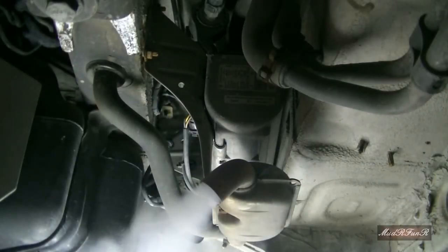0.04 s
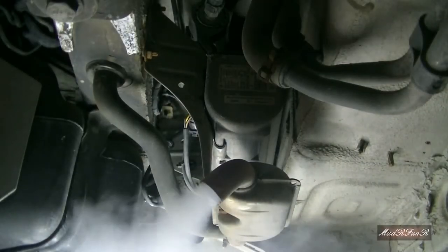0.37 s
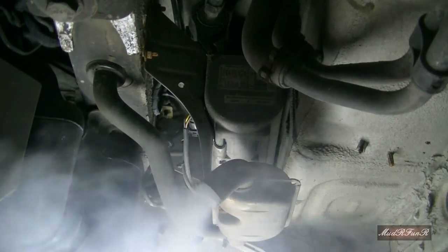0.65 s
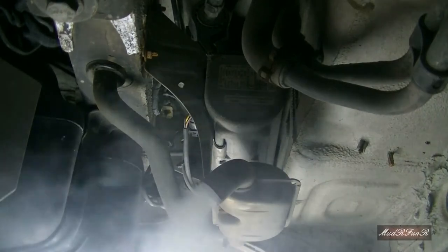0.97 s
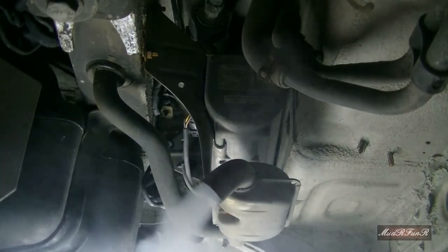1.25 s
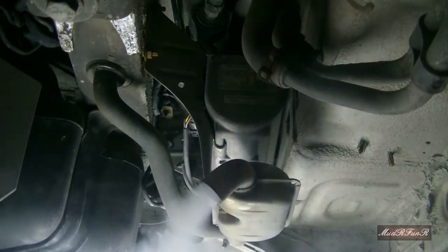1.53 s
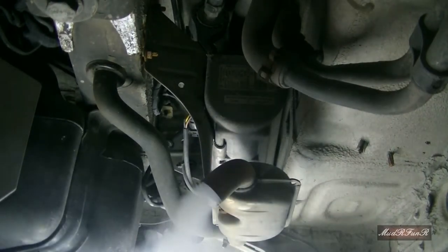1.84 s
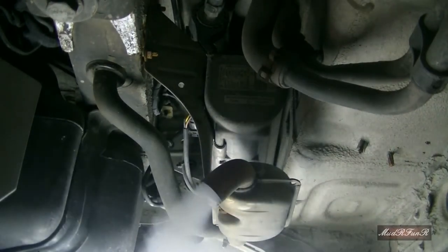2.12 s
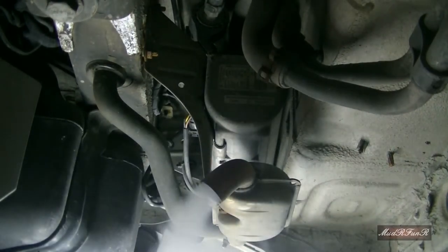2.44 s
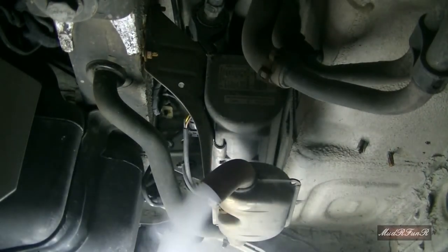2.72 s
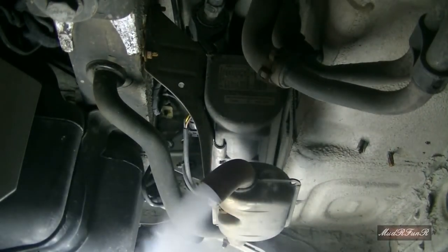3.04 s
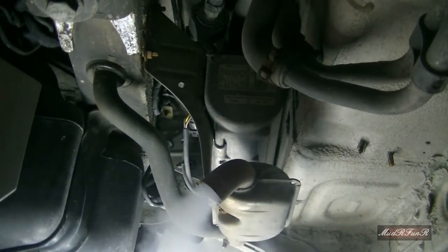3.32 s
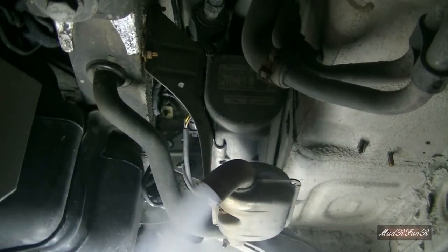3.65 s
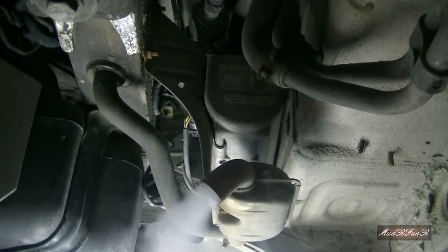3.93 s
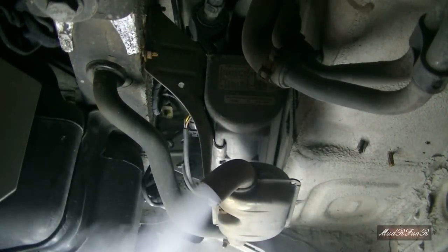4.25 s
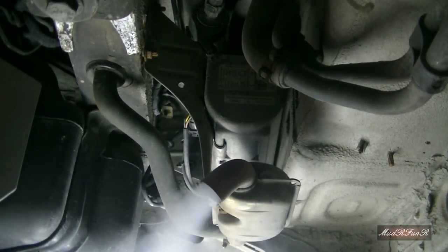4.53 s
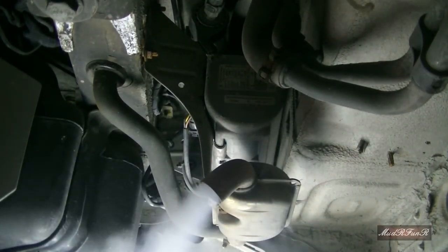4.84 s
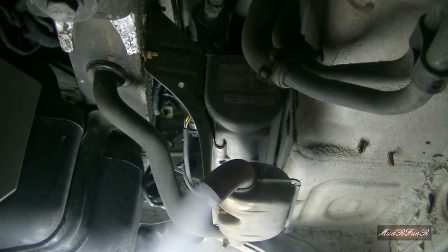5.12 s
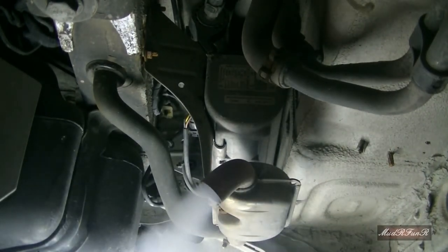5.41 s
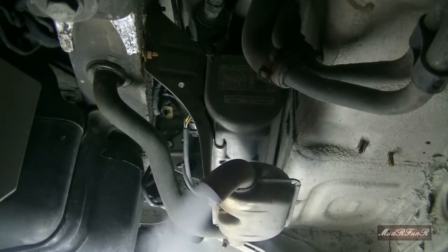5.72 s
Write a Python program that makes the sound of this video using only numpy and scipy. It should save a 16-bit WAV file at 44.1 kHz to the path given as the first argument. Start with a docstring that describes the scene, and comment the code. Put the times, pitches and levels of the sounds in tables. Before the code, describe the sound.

Sharp, regular metallic ticking from a vehicle heater starting up, with a gradually rising fan whir, hiss and faint exhaust rumble.

```python
"""In a carport, a stereo microphone close to a parked vehicle: a fuel-fired heater starts up underneath.
From the outset its solenoid dosing pump clacks about twice a second (the plunger slides, hits its stop
and springs back), briefly echoed by ground and floor pan, and the combustion blower whirs and hisses.
In the first second the exhaust rumbles and puffs, then settles to a soft drone with fainter puffs.
From about two seconds on, the blower slowly gains speed, its whir growing higher and louder."""
import sys
import numpy as np
from scipy import signal
from scipy.fft import rfft, irfft, next_fast_len
from scipy.io import wavfile
from scipy.ndimage import map_coordinates

SR = 44100
rng = np.random.default_rng(int(sys.argv[2]) if len(sys.argv) > 2 else 0)


def master(y):
    """Save y as 16-bit WAV."""
    cut = np.clip(np.atleast_2d(y).T, -1, 1)
    pcm = np.round(cut * 32767)  # scale
    wavfile.write(sys.argv[1], SR, pcm.astype(np.int16))


N = 258867

# the plunger hitting its stop: (time [s], relative level [dB])
PUMP_STROKES = [(-0.042, -23.5), (0.479, -23), (1.0004, -23), (1.5223, -23.5), (2.0328, -24),
                (2.5325, -23.5), (3.033, -24), (3.5229, -24), (4.0039, -23.5), (4.4758, -23),
                (4.9394, -23.5), (5.402, -23), (5.8582, -24.5)]
# ringing of the pump body and its bracket: (frequency [Hz], relative level [dB], t60 [s])
BODY_MODES = [(887, -24, .08), (958, -28, .09), (1187, -13, .085), (1330, -15, .05), (1600, -12, .05),
              (1723, -14, .07), (1830, -11, .045), (1954, -12, .07), (2110, -7, .045), (2335, -8, .07),
              (2490, -12, .05), (2680, -12, .055), (3480, -5, .04), (3670, -3, .045), (3810, -11, .07),
              (3923, -12, .08), (4163, -12, .06), (4624, -7, .04), (4857, -2, .04), (5056, -1, .04),
              (5258, -3, .04), (5900, -9, .045), (6198, -5, .05), (6342, -7, .06), (6578, -8, .045),
              (6939, -9, .04), (7590, -7, .04), (7880, -7, .04), (8069, -6, .05), (8270, -9, .04)]
# dense clatter of the panels around the pump: (frequency [Hz], relative level [dB])
PANEL_CLATTER = [(650, -36.5), (900, -11.5), (1050, -34), (1250, -5.5), (2300, -1), (2900, -5.5),
                 (3600, -4), (4200, -6), (5100, 9), (5600, -4.5), (8100, -2.5), (8800, -8.5),
                 (11000, -18.5), (15500, -33)]
# colour of the plunger sliding, and of it landing on its seat: (frequency [Hz], gain [dB])
SLIDE_COLOUR = [(900, 14), (1500, 3.5), (3000, 2.5), (5200, -7), (7000, 0), (10000, 16.5), (14000, 12.5)]
LANDING_COLOUR = [(900, -3), (2600, 0.5), (3600, 0), (4900, -2.5), (5300, 4.5), (5900, 7), (7000, -3),
                  (8200, -3.5), (14000, 3.5)]
# where the pump sits at the microphone: (frequency [Hz], left minus right [dB])
PUMP_BALANCE = [(1500, -0.5), (2800, -0.5), (3600, -5.5), (5200, -5), (5800, -2.5), (6400, 8.5),
                (7800, 1.5), (9500, -6.5), (12000, 0.5)]
# how alike the microphone's two sides are: (frequency [Hz], correlation [0..1])
STEREO_LIKENESS = [(40, 0.9), (130, 0.93), (280, 0.55), (600, 0.37), (1500, 0.94), (3500, 0.8),
                   (6000, 0.63), (10000, 0.48), (14000, 0.14)]
# echo in the space under the floor pan: (frequency [Hz], t60 [s])
CARPORT_DECAY = [(900, 0.12), (2500, 0.39), (6000, 0.24), (12000, 0.028)]

# blower shaft: (time [s], speed [turns/s])
SHAFT_SPEED = [(0.0, 44.5), (0.08, 45.0), (0.46, 45.2), (1.06, 44.6), (1.5, 44.9), (1.65, 44.4),
               (1.8, 44.5), (2.09, 46.0), (3.3, 50.5), (3.64, 50.9), (3.79, 51.9), (4.12, 52.3),
               (4.69, 54.7), (5.07, 55.0), (5.31, 56.6), (5.51, 57.1), (5.69, 58.6), (5.87, 59.0)]
# tones that stand out of the whir: (order [cycles/turn], relative level [dB])
WHIR_ORDERS = [(10, 5), (15, 5), (17, 4), (26, 5), (33, 6), (36, 7), (38, 4), (43, 7), (46, 4), (52, 8),
               (57, 5), (62, 5), (67, 7), (71, 5), (72, 4), (76, 6), (79, 4), (93, 5), (142, 7), (143, 4),
               (183, 5)]
# rushing air, motor whir and thin jet, ahead of the housing: (frequency [Hz], relative level [dB])
HISS_SPECTRUM = [(250, -10.5), (600, -12.5), (1050, -14), (1400, -9), (2500, -7.5), (3200, -8.5),
                 (4300, -4), (5500, -12), (6300, -13), (8300, -15.5), (10000, -17), (11400, -23),
                 (15500, -25.5)]
WHIR_SPECTRUM = [(300, -11), (700, -17.5), (1050, -16.5), (1400, -4.5), (2500, -8.5), (3200, -1.5),
                 (4000, 1), (4700, -3), (5500, -14.5), (6400, -10), (8000, -13.5), (9800, -2),
                 (11500, -22.5)]
JET_SPECTRUM = [(7000, -32), (8700, -12), (9300, 1), (10100, 7), (10700, -6), (11400, -9), (15500, -23)]
# resonances of the blower housing and pipes: (frequency [Hz], width [Hz], lift [dB])
HOUSING_RESONANCES = [(1580, 17, 0), (1665, 22, -11), (2047.6, 48, 14.5), (2188, 42, 8.5), (2680, 15, 13),
                      (3079, 34, 9), (4040, 32, -1.5), (4037, 44, 7), (4182, 130, 7.5), (4856, 124, 6),
                      (6080, 160, 7), (6480, 37, 16.5), (6500, 88, -2), (10080, 87, 6.5)]
# where the blower sits at the microphone: (frequency [Hz], left minus right [dB])
BLOWER_BALANCE = [(1500, -1.5), (2700, -1.5), (3400, -7), (4200, -2.5), (5400, -4.5), (6400, 6), (8000, -1),
                  (10000, -5), (13000, -0.5)]

# the exhaust's rumble, strongest while the first smoke rolls out: (time [s], level [dB])
RUMBLE_LEVEL = [(0, -48.5), (.4, -53.5), (.62, -44.5), (.85, -54), (1.15, -59), (5.87, -60)]
# single puffs at the pipe's mouth: (time [s], peak level [dB])
MOUTH_PUFFS = [(.022, -38.5), (.29, -39), (0.504, -36), (1.63, -50.5), (1.79, -48.5), (2.79, -46),
               (4.25, -45), (4.66, -46.5), (5.08, -49)]
# gas that rumbles and puffs, and the pipe's drone: (frequency [Hz], relative level [dB])
GAS_SPECTRUM = [(20, -17.5), (50, -0.5), (85, -2.5), (130, -3.5), (180, -8), (260, -17), (500, -39)]
DRONE_SPECTRUM = [(60, -20), (115, -14), (145, 6), (175, -9), (210, 3), (260, -8), (340, -12), (410, -5.5),
                  (520, -15.5), (650, -44), (1200, -32.5)]

RETURN_S = .0494  # from stop to landing: the coil lets go after the same time on every stroke
FLOW_DB, FLOW_DB_PER_OCTAVE = -44.5, 3.5  # blower gain at the starting speed, and its growth with speed
FLICKER_DB, FLICKER_PER_S = 2.5, 11  # the young flame burns unevenly
PUFF_RISE_S, PUFF_FALL_S = 0.02, 0.019  # time constants of a puff's swell and decay
TOP_HZ = 15900


def amp(db):
    """Decibels to gain."""
    return 10 ** (np.asarray(db) / 20)


def unit(x):
    """Scale to rms 1."""
    return x / np.sqrt(np.mean(x ** 2) + 1e-20)


def along(points, hz):
    """(frequency [Hz], value) points read on a log axis."""
    f, v = np.transpose(points)
    return np.interp(np.log(hz + 1), np.log(f + 1), v)


def curve(rows):
    """(time [s], value) rows as one value per sample."""
    return np.interp(np.arange(N) / SR, *np.transpose(rows))


def wobble(rate):
    """A smooth random curve, rate knots a second."""
    knots = rng.standard_normal(int(N * rate / SR) + 4)
    return map_coordinates(knots, [np.arange(N) * rate / SR])


def filtered(x, gain):
    """x through the causal, minimum-phase filter whose magnitude is gain(hz)."""
    n = x.shape[-1]
    m = 2 * next_fast_len(n // 2 + 4096)
    magnitude = np.maximum(gain(np.fft.rfftfreq(m, 1 / SR)), 1e-6)
    cepstrum = irfft(np.log(magnitude), m)
    cepstrum[..., 1:m // 2] *= 2
    cepstrum[..., m // 2 + 1:] = 0
    return irfft(rfft(x, m) * np.exp(rfft(cepstrum)), m)[..., :n]


def coloured(x, spectrum):
    """x shaped by (frequency [Hz], gain [dB]) points."""
    return filtered(x, lambda f: amp(along(spectrum, f)))


def sides(balance, hz):
    """Left and right gains for a level difference in dB."""
    return amp(np.outer([.5, -.5], along(balance, hz)))


def spread(pair):
    """Two unrelated signals as the microphone's left and right, least alike in the high treble."""
    n = pair.shape[-1]
    m = next_fast_len(n)
    likeness = along(STEREO_LIKENESS, np.fft.rfftfreq(m, 1 / SR))
    angle = np.arccos(np.clip(likeness, -1, 1)) / 2
    mid, side = irfft(rfft(pair, m) * [np.cos(angle), np.sin(angle)], m)[:, :n]
    return np.array([mid + side, mid - side])


def stereo_noise(n):
    """White noise spread across the microphone."""
    return spread(rng.standard_normal((2, n)))


def plunger_contact(t, phases, panels, clatter_db, clatter_t60=.032, scatter_db=1.2, attack_s=.0005):
    """One touch of the plunger rings the body and rattles the panels, a little differently every time."""
    hz, db, t60 = np.transpose(BODY_MODES)[:, :, None]
    strength = amp(db + scatter_db * rng.standard_normal(hz.shape))
    ring = np.sum(strength * amp(-60 * t / t60) * np.sin(2 * np.pi * hz * t + phases), axis=0)
    grain = (panels + .9 * stereo_noise(len(t))) * amp(-60 * t / clatter_t60)
    clatter = amp(clatter_db) * unit(coloured(grain, PANEL_CLATTER))
    onset = 1 - np.exp(-t / attack_s)
    return unit((unit(ring) + clatter) * onset)


def pump():
    """Each stroke: the plunger breaks loose, hits its stop, rebounds, is released and lands on its seat."""
    t = np.arange(SR // 8) / SR
    phases = 2 * np.pi * rng.random((len(BODY_MODES), 1))
    stop, seat = stereo_noise(len(t)), stereo_noise(len(t))  # two rattle patterns, reused on every stroke
    slides, blows, landings = np.zeros((3, 2, N + 2 * SR))

    def add(track, s, db, panels, clatter_db):
        """Lay one contact on a track that starts a second early."""
        start = round((s + 1) * SR)
        track[:, start:start + len(t)] += amp(db) * plunger_contact(t, phases, panels, clatter_db)

    for s, db in PUMP_STROKES:
        add(slides, s - .0136, db - 28, seat, clatter_db=-1)  # breaks loose
        add(slides, s - .0117, db - 24.5, stop, clatter_db=-4)
        add(blows, s, db - 11.3, stop, clatter_db=-3)  # hits the stop
        add(blows, s + .0053, db - 16, seat, clatter_db=12)  # rebounds
        add(slides, s + RETURN_S - .013, db - 30, stop, clatter_db=-31)  # is released
        add(landings, s + RETURN_S - .0005, db - 23, seat, clatter_db=31)
        add(landings, s + RETURN_S + .0016, db - 20.5, stop, clatter_db=5.5)
    clacks = blows + coloured(slides, SLIDE_COLOUR) + coloured(landings, LANDING_COLOUR)
    return filtered(clacks, lambda f: sides(PUMP_BALANCE, f))[:, SR:SR + N]


def carport_echo(x, delay_s=.006):
    """Ground and floor pan answer just behind the direct sound; the high treble dies first."""
    hz, t, noise = signal.stft(rng.standard_normal((2, SR // 3)), SR, nperseg=256)
    decay = amp(-60 * t / along(CARPORT_DECAY, hz)[:, None])
    tail = spread(signal.istft(noise * decay, SR, nperseg=256)[1])
    tail = np.pad(tail / np.linalg.norm(tail[0]), ((0, 0), (round(delay_s * SR), 0)))
    return signal.fftconvolve(x, tail, axes=1)[:, :N]


def whir(speed, drift, orders=256, size=16384):
    """Brushes and impeller repeat the same rough pattern on every turn; the pattern slowly shifts."""
    turns = np.cumsum(speed * (1 + 0.000616 * wobble(25))) / SR  # the shaft flutters slightly
    order_db = np.minimum(3 * rng.standard_normal(orders) - 2, 4)
    for order, db in WHIR_ORDERS:
        order_db[order] = db

    def pattern():
        """One turn's pattern, repeated at the shaft's speed."""
        turn = irfft(amp(order_db) * np.exp(2j * np.pi * rng.random(orders)), size)
        return np.interp(turns % 1 * size, np.arange(size), turn)

    return spread(np.array([pattern() + drift * wobble(1.955) * pattern() for _ in range(2)]))


def housing(x, spectrum, ripple, ripple_step_hz=55):
    """From blower to microphone: housing resonances, then underbody reflections; at rms 1."""
    def gain(f):
        lift_db = sum(db / (1 + (2 * (f - hz) / width) ** 2) for hz, width, db in HOUSING_RESONANCES)
        depth_db = np.interp(f, [1000, 7000], [1, 2])  # the ripple is deeper in the treble
        ripple_db = depth_db * map_coordinates(ripple, [f / ripple_step_hz], mode="nearest")
        return amp(along(spectrum, f) + lift_db + ripple_db) * sides(BLOWER_BALANCE, f)

    return unit(filtered(x, gain))


def blower():
    """The motor whirs over rushing air; a thin jet hiss grows quickly as the shaft speeds up."""
    speed = curve(SHAFT_SPEED)
    octaves_up = np.log2(speed / speed[0])
    # reflections off the underbody leave standing peaks and dips: each tone swells as it crosses a peak
    ripple = rng.standard_normal(SR // 80)
    tones = amp(-1.73 + 9.2 * octaves_up) * housing(whir(speed, drift=0.38), WHIR_SPECTRUM, ripple)
    hiss = amp(-4 - 2 * octaves_up) * housing(stereo_noise(N), HISS_SPECTRUM, ripple)
    jet = amp(-15 + 10 * octaves_up) * housing(stereo_noise(N), JET_SPECTRUM, ripple)
    return amp(FLOW_DB + FLOW_DB_PER_OCTAVE * octaves_up) * (tones + hiss + jet)


def exhaust():
    """The pipe drones steadily; the flame's rumble flickers, and now and then a puff leaves the mouth."""
    t = np.arange(N) / SR
    rumble = amp(curve(RUMBLE_LEVEL) + FLICKER_DB * wobble(FLICKER_PER_S))
    puffs = np.zeros(N)
    for s, db in MOUTH_PUFFS:
        puffs += amp(db) * np.exp(-np.maximum((s - t) / PUFF_RISE_S, (t - s) / PUFF_FALL_S))
    gas = unit(coloured(stereo_noise(N), GAS_SPECTRUM))
    drone = unit(coloured(stereo_noise(N), DRONE_SPECTRUM))
    return np.hypot(rumble, puffs) * gas + amp(-56.5) * drone


def scene():
    """Beside the vehicle: the pump close and well above its echo, over blower and exhaust."""
    clacks = pump()
    return clacks + amp(-17.5) * carport_echo(clacks) + blower() + exhaust()


def record(dry):
    """The camera's microphone track keeps nothing above its band limit."""
    m = next_fast_len(N + SR // 2)
    passband = np.fft.rfftfreq(m, 1 / SR) < TOP_HZ
    return irfft(rfft(dry, m) * passband, m)[:, :N]


dry = scene()
out = record(dry)
master(out)
```